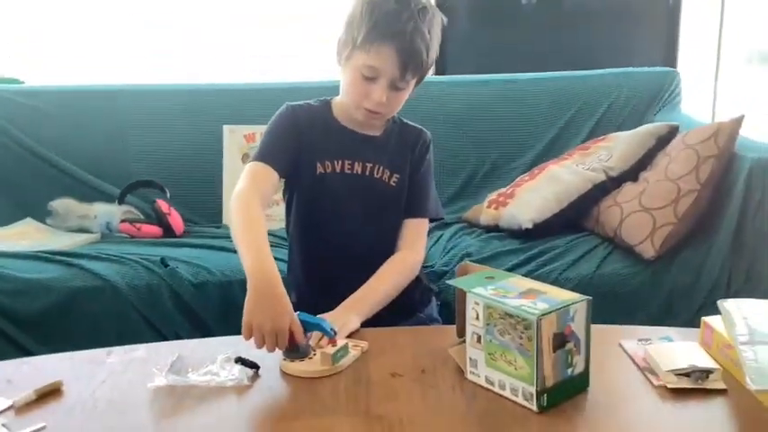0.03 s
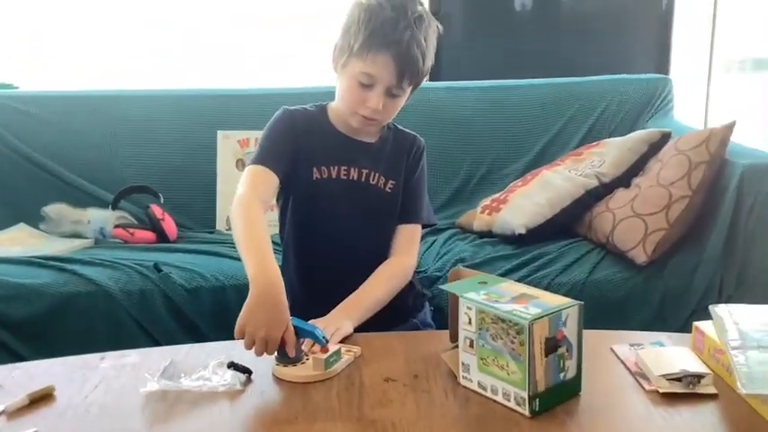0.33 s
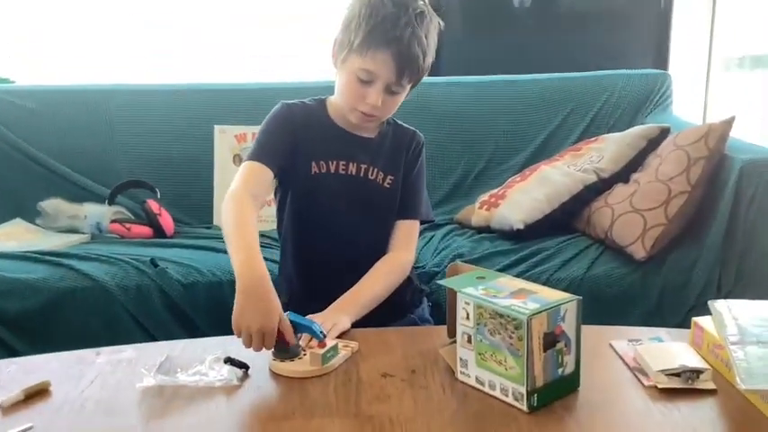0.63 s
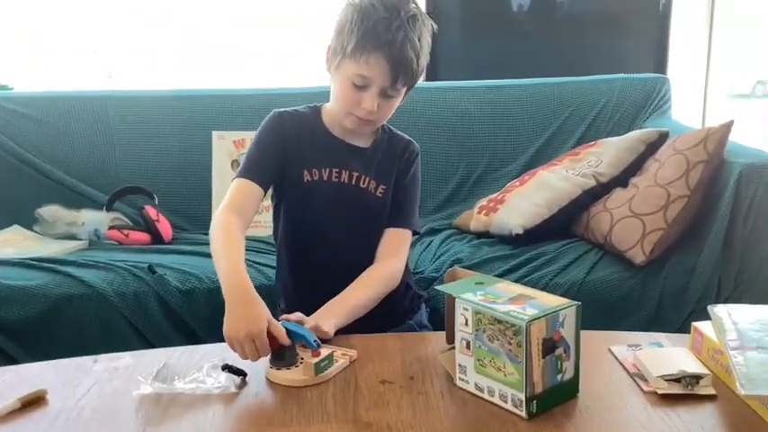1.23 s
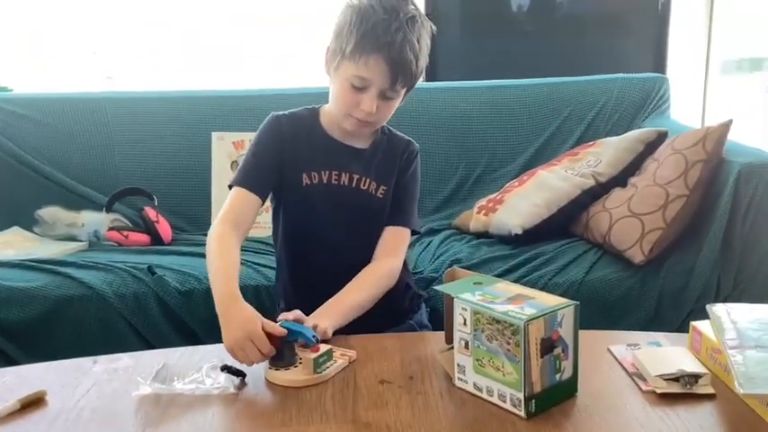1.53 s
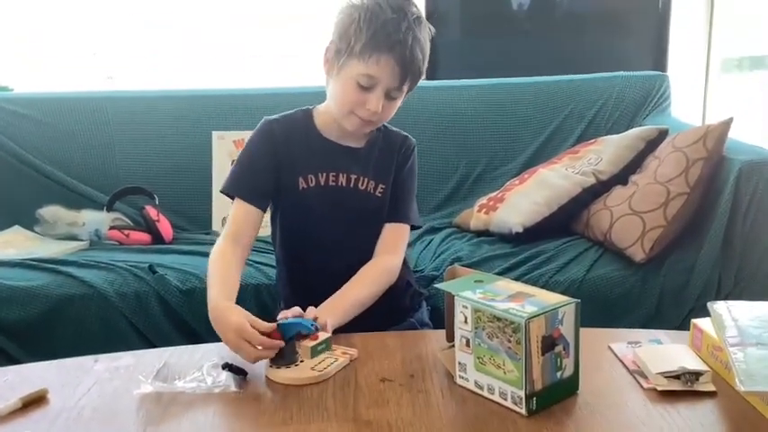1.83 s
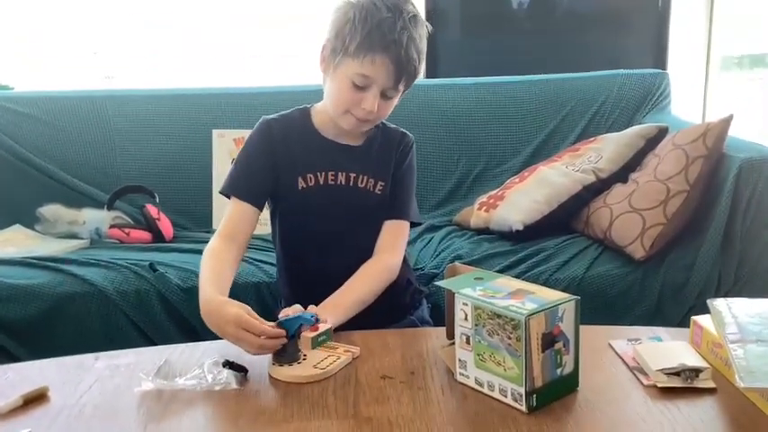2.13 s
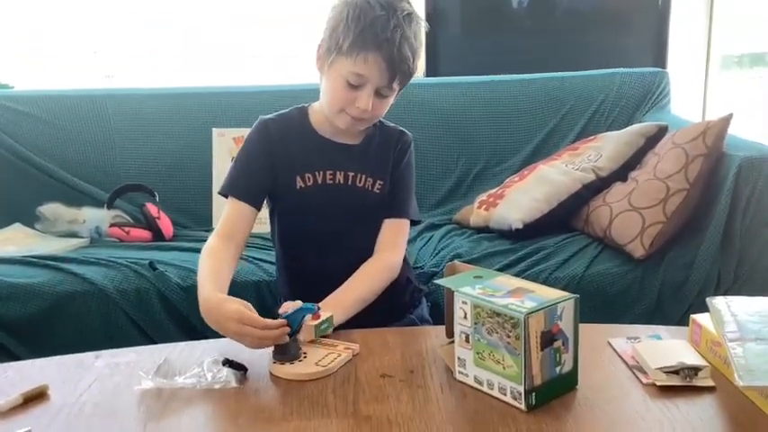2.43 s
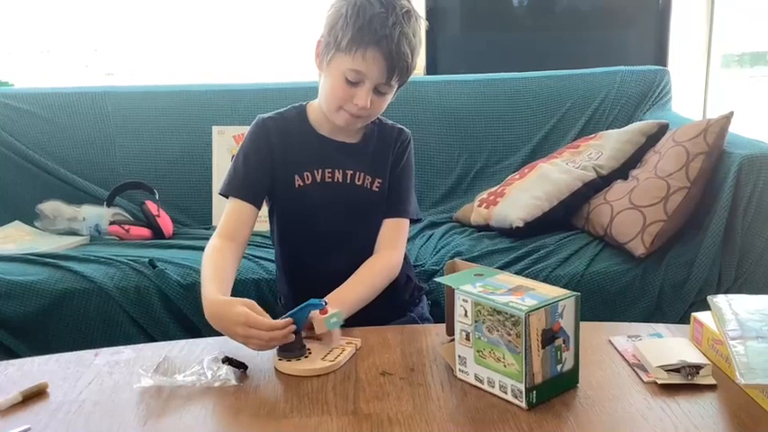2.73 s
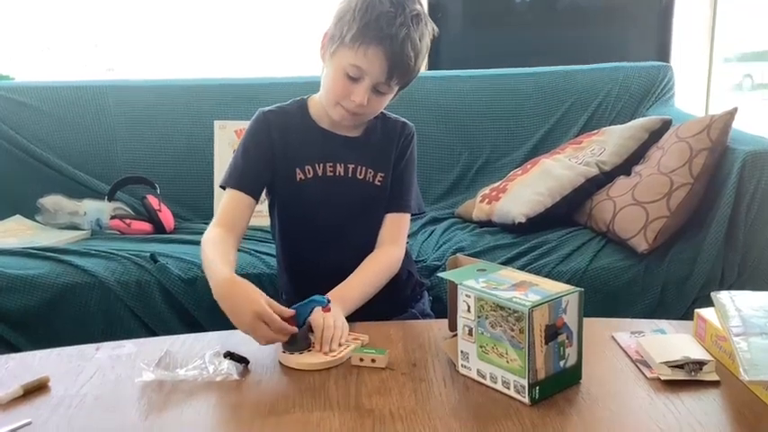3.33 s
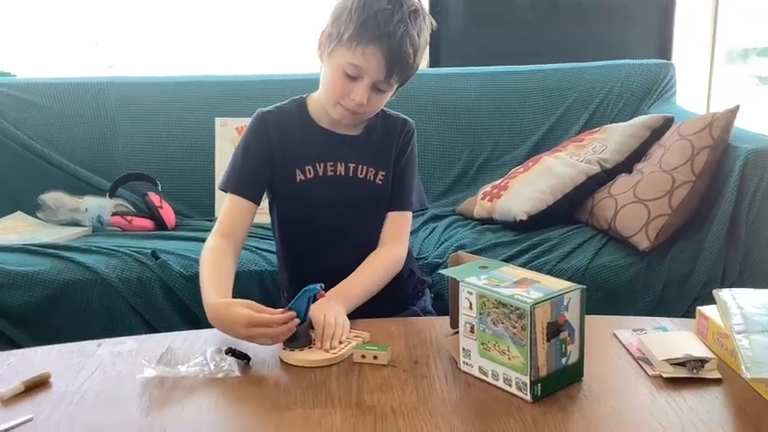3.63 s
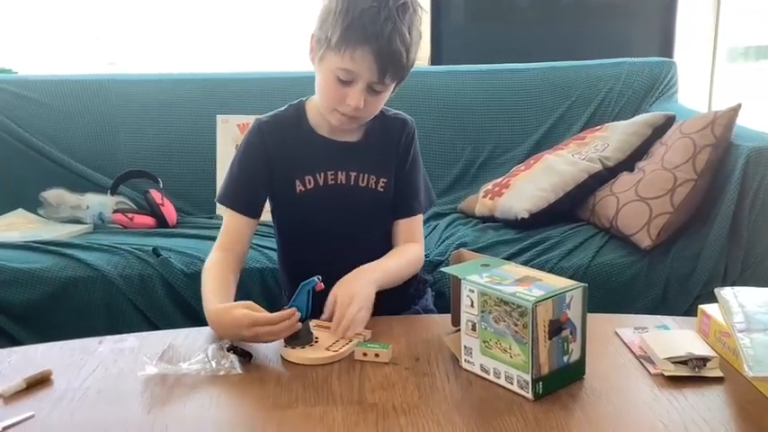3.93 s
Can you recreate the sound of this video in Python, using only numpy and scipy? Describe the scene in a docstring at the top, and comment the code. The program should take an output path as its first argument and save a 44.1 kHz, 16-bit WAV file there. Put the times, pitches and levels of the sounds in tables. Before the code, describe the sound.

A small toy crane clicks as it is turned, then knocks on a wooden table.

```python
"""Toy crane on a wooden table

A small toy crane is turned by hand: its plastic ratchet snaps tooth by tooth, its loose parts tap.
Its wooden base knocks on the table and a loose wooden piece topples with a short clatter.
Fingers rub on the toy; a living room answers with a few echoes, a short tail and a low rumble."""
import sys
import numpy as np
from scipy import signal
from scipy.fft import rfft, irfft, next_fast_len
from scipy.io import wavfile
from scipy.ndimage import uniform_filter1d, minimum_filter1d, map_coordinates

SR = 44100
rng = np.random.default_rng(int(sys.argv[2]) if len(sys.argv) > 2 else 0)


def unload_audio(sound):
    """Save the sound as a 16-bit wav file, at the path given as the first command line argument."""
    columns = np.transpose(np.atleast_2d(sound))
    # keep every value between -1 and 1, then stretch to whole-number steps
    steps = np.round(np.clip(columns, -1, 1) * 32767)
    wavfile.write(sys.argv[1], SR, steps.astype(np.int16))


N = 176400
T = np.arange(SR // 8) / SR  # time within one hit [s]


def amp(db):
    """Decibels to gain."""
    return 10 ** (np.asarray(db) / 20)


def unit(x):
    """Scale to rms 1."""
    return x / np.sqrt(np.mean(x ** 2) + 1e-20)


def along(points, hz):
    """Read a curve of (frequency [Hz], value) points on a log frequency axis."""
    freqs, values = np.transpose(points)
    return np.interp(np.log(hz + 1), np.log(freqs), values)


def filtered(x, response):
    """Zero-phase EQ: response gives the gain at each frequency."""
    size = next_fast_len(len(x) + 4096)
    return irfft(rfft(x, size) * response(np.fft.rfftfreq(size, 1 / SR)), size)[:len(x)]


def cut(x, hz, kind, order):
    """A causal high-pass or low-pass."""
    return signal.sosfilt(signal.butter(order, min(hz, SR / 3), kind, fs=SR, output="sos"), x)


def noise(colour, size):
    """Coloured noise of rms 1."""
    return unit(filtered(rng.standard_normal(size), lambda hz: amp(along(colour, hz))))


def pulse(colour):
    """A single pulse with a smooth spectrum, rms 1."""
    return unit(filtered(signal.unit_impulse(len(T), "mid"), lambda hz: amp(along(colour, hz))))


def burst(colour, hold, t60):
    """The noise of one contact: fast attack, hold [s], decay."""
    attack = 1 - np.exp(-T / .0005)
    decay = amp(-60 * np.maximum(T - hold, 0) / t60)
    return unit(noise(colour, len(T)) * attack * decay)


def ring(modes, rise_s, scatter_db, detune):
    """Damped modes, struck a little differently each time."""
    hz, db, t60 = np.transpose(modes)[:, :, None]
    strength, shift, phase = rng.standard_normal((3, len(modes), 1))
    decays = amp(db + scatter_db * strength - 60 * T / t60)
    partials = np.sin(2 * np.pi * (hz * (1 + detune * shift) * T + phase))
    attack = 1 - np.exp(-(T / rise_s) ** 2)
    return unit((decays * partials).sum(0) * attack)


def at_level(x, db):
    """Give a hit the energy of 4 ms at this level."""
    return x * amp(db) * np.sqrt(.004 * SR / np.sum(x ** 2))


def add(out, start_s, x):
    """Mix x into out from start_s."""
    part = out[max(0, round(start_s * SR)):][:len(x)]
    part += x[:len(part)]


# early reflections off near surfaces (delay [s], relative level [dB])
ECHOES = [(.0087, -48), (0.0116, -26), (0.0214, -22), (0.025, -20.5), (.0302, -18)]
# decay of the room's tail (frequency [Hz], t60 [s])
ROOM_DECAY = [(150, 0.99), (600, 0.48), (2000, 0.29), (7000, .33), (10000, 0.31), (15000, 0.26)]


def in_room(hit, send, echo_db, tail_db):
    """A hit, its echoes and a tail coloured by send, the sound it spreads in all directions."""
    hz, t, bands = signal.stft(rng.standard_normal(SR // 2), SR, nperseg=256)
    decay = amp(-60 * t / along(ROOM_DECAY, hz)[:, None])
    tail = signal.istft(bands * decay, SR, nperseg=256)[1]
    tail *= 1 - np.exp(-(np.arange(len(tail)) / SR / .0059) ** 2)  # blooms in about 6 ms
    send_power = uniform_filter1d(np.abs(rfft(send)) ** 2, size=25)
    send_hz = np.fft.rfftfreq(len(send), 1 / SR)
    wet = filtered(tail, lambda f: np.sqrt(np.abs(np.interp(f, send_hz, send_power))))
    out = wet * amp(tail_db) * np.linalg.norm(hit) / np.linalg.norm(wet)
    add(out, 0, hit)
    for delay, db in ECHOES:
        add(out, delay, amp(db + echo_db) * hit)
    ceiling_slap = amp(echo_db - 8) * cut(hit, 6800, "highpass", order=4)
    add(out, .0147, ceiling_slap)
    return out


# room tone spectrum (frequency [Hz], relative level [dB])
RUMBLE_COLOUR = [(25, -21), (45, -24), (68, 0.5), (110, 1.5), (160, -4.5), (230, 3), (380, -10), (700, -11),
                 (1100, -5), (2000, -14), (4000, -19.5), (8000, -24), (15000, -55)]


def room_rumble():
    """The living room's steady, low bed of noise."""
    return amp(-55) * noise(RUMBLE_COLOUR, N)


# envelope of the finger rub (time [s], level [dB])
RUB_LEVEL = [(0, -53), (.3, -56.5), (.7, -63), (.8, -61), (1.05, -64.5), (1.2, -60), (1.5, -63.5),
             (2.2, -59.5), (2.65, -63), (2.78, -60.5), (3.1, -65), (4, -67)]
# friction spectrum (frequency [Hz], relative level [dB])
RUB_COLOUR = [(500, -63), (2000, -12), (4500, -1), (7500, 6), (11000, -0.5), (15000, -8.5), (16500, -36)]


def finger_rub():
    """A faint, slightly uneven hiss of fingers sliding on the toy."""
    t = np.arange(N) / SR
    knots_per_s, uneven_db = 25, .6
    knots = rng.standard_normal(int(t[-1] * knots_per_s) + 4)
    wobble_db = uneven_db * map_coordinates(knots, [t * knots_per_s])
    return noise(RUB_COLOUR, N) * amp(np.interp(t, *np.transpose(RUB_LEVEL)) + wobble_db)


# one click per tooth (time [s], level [dB], pawl pitch [Hz], pawl ring [dB], body EQ [dB], edge EQ [dB])
TEETH = [(0.0803, -20, 5850, -8, 10.5, -3), (0.4876, -19.5, 7800, -2, 11.5, -1),
         (1.6008, -13, 7080, 2.5, 3.5, 1), (1.686, -12, 6250, 1.5, 3.5, -4),
         (1.7479, -15, 6910, -7, 3, -0.5), (1.9161, -12.5, 7130, 7.5, 3, 3), (2.0752, -15, 7300, -10, 0, 5),
         (2.2839, -16.5, 9640, 4.5, 5.5, 4), (2.4203, -17.5, 7130, -1, 1, 3),
         (3.4436, -15.5, 6820, 0.5, 5, -0.5), (3.5585, -14.5, 6510, -10.5, -1.5, -8.5),
         (3.6204, -16.5, 6770, 4, 5.5, 2.5), (3.7056, -19, 6690, -2.5, 5, 2),
         (3.7643, -17, 6600, 1, 2.5, 1)]
# modes of the plastic housing (frequency [Hz], relative level [dB], t60 [s])
HOUSING_MODES = [(1707, -20.5, 0.022), (2694, -19.5, 0.015), (3630, -16, 0.018), (5450, -0.5, 0.013),
                 (6530, -18, 0.021), (7060, 6, 0.014), (9290, -9, 0.0066), (9436, 5.5, 0.0068),
                 (10750, -4.5, 0.0093), (13000, -44.5, .007), (15100, 1, 0.0027)]
# the pawl's bright transient (frequency [Hz], relative level [dB])
SNAP_COLOUR = [(300, -39.5), (1200, -26), (2600, -13.5), (4400, -13.5), (5500, 1), (8000, 6), (10500, -2.5),
               (12500, -6.5), (15000, -6.5), (16500, -11)]


def ratchet():
    """The pawl snaps off each tooth, rings briefly and shakes the housing."""
    body_hz, edge_hz = 4970, 11000
    snap_t60, pawl_t60, lead_in_s = .009, .0065, .0014
    out = np.zeros(N)
    for start, db, pawl_hz, pawl_db, body_db, edge_db in TEETH:
        # body is a low shelf; edge applies once across the band and twice above edge_hz
        below = lambda f, corner_hz: 1 / (1 + (f / corner_hz) ** 8)
        eq = lambda f: amp(body_db * below(f, body_hz) + edge_db * (2 - below(f, edge_hz)))
        housing = ring(HOUSING_MODES, rise_s=.00066, scatter_db=3, detune=.015)
        pawl = amp(pawl_db) * ring([(pawl_hz, 0, pawl_t60)], rise_s=.0009, scatter_db=0, detune=0)
        snap = amp(4.5) * burst(SNAP_COLOUR, hold=.00091, t60=snap_t60)
        direct = filtered(unit(housing + snap), eq) + pawl
        send = filtered(unit(amp(-4) * housing + pulse(SNAP_COLOUR)), eq) + amp(-5.5) * pawl
        add(out, start, in_room(at_level(direct, db), send, echo_db=0, tail_db=-9))
        # each click opens with a faint noise lead-in that softens its attack
        lead_in = burst(SNAP_COLOUR, hold=lead_in_s, t60=snap_t60)
        add(out, start - lead_in_s, at_level(lead_in, db - 12.5))
    return out


# taps of loose plastic parts (time [s], level [dB])
TAPS = [(0.2069, -35), (2.428, -32.5), (2.709, -38), (2.789, -42), (2.8407, -30.5), (2.8553, -28),
        (2.878, -42), (2.954, -38.5), (3.3074, -21), (3.321, -33), (3.331, -35)]
# spectrum of one tap (frequency [Hz], relative level [dB])
TAP_COLOUR = [(500, -33), (1600, 9.5), (3500, -3), (6300, 7.5), (8500, -4), (12000, -21.5), (16000, -23)]


def loose_parts():
    """The jib and hook tap in their joints when the toy is jolted."""
    out = np.zeros(N)
    for start, db in TAPS:
        tap = at_level(burst(TAP_COLOUR, hold=.00021, t60=.014), db)
        add(out, start, in_room(tap, pulse(TAP_COLOUR), echo_db=1, tail_db=-6))
    return out


# wood hitting the table (time [s], level [dB], low-pass corner [Hz], table-top share [dB])
KNOCKS = [(.222, -40.5, 1630, 12), (.244, -45.5, 1530, -2), (.936, -53.5, 3000, -11), (1.003, -49, 2560, 1),
          (1.1398, -25.5, 2700, -4), (1.208, -42, 2380, 9), (2.581, -45, 2000, 6), (2.712, -40.5, 2480, -1),
          (2.8408, -15, 2700, 1.5), (2.8555, -19, 1720, 6), (2.987, -39.5, 2440, 4),
          (3.030, -30.5, 1030, -1.5), (3.065, -24, 1300, 10), (3.087, -33, 1190, -1),
          (3.17, -18.5, 2400, 2.5), (3.2355, -8.5, 4360, -12), (3.259, -15.5, 5100, -12),
          (3.266, -21.5, 3000, 9), (3.2835, -11, 3260, -18), (3.3075, -11, 5000, -11.5),
          (3.321, -24, 3960, 1.5), (3.336, -20, 2820, -12), (3.347, -18.5, 2880, -1),
          (3.355, -29.5, 2810, -16), (3.364, -27, 2620, -20)]
# modes of the toy's wood on the table (frequency [Hz], relative level [dB], t60 [s])
WOOD_MODES = [(467, -19.5, 0.044), (628.3, -15, 0.16), (886, -8, 0.059), (1182, -4.5, 0.065),
              (1380, 0, 0.011), (1740, 0.5, 0.022), (2150, 4.5, 0.028), (2558, -0.5, 0.025),
              (3030, -1.5, 0.016), (3270, -29, 0.021), (4130, -10, 0.011), (5070, -1.5, 0.014),
              (6400, -5, 0.006)]
# a knock's transient (frequency [Hz], relative level [dB])
CRACK_COLOUR = [(150, -29), (450, -16), (1000, 2), (2200, 3), (4000, 0), (7000, -3.5), (10000, -16),
                (16000, -23)]


def wood_knocks():
    """Wood meets the table; softer contacts lose their treble, flatter ones drive the table top."""
    table_hz, table_octaves, crack_db = 1036, .7, -2.5

    def contact(x, corner_hz, table_db):
        """A bell EQ for the table top, then a high cut and a low cut."""
        bell = lambda f: amp(table_db * np.exp(-(np.log2((f + 1) / table_hz) / table_octaves) ** 2))
        softened = cut(filtered(x, bell), corner_hz, "lowpass", order=2)
        return cut(softened, 520, "highpass", order=2)

    out = np.zeros(N)
    for start, db, corner_hz, table_db in KNOCKS:
        body = ring(WOOD_MODES, rise_s=.0009, scatter_db=1.2, detune=.005)
        crack = amp(crack_db) * burst(CRACK_COLOUR, hold=.0017, t60=.019)
        direct = contact(body + crack, corner_hz, table_db)
        send = contact(amp(-.5) * body + amp(crack_db) * pulse(CRACK_COLOUR), corner_hz, table_db)
        add(out, start, in_room(at_level(direct, db), send, echo_db=-5, tail_db=-7))
    return out


# the table top's low boom (frequency [Hz], relative level [dB])
THUD_COLOUR = [(70, -23), (130, -18), (205, -1), (300, -12), (460, -3.5), (650, -12), (1200, -51)]


def table_thud():
    """The table top booms softly under each knock, more so when the contact is flat."""
    out = np.zeros(N)
    for start, db, _, table_db in KNOCKS:
        boom = burst(THUD_COLOUR, hold=.005, t60=.45)
        add(out, start, at_level(boom, db + table_db - 23.5))
    return out


def scene():
    """The toy over the room's steady rumble, in mono."""
    return (ratchet() + wood_knocks() + table_thud() + loose_parts() + finger_rub() + room_rumble())[None]


def record(dry):
    """A fast limiter catches the highest peaks; a steep low-pass trims the very top."""
    limit, span, top_hz = .88, round(.003 * SR), 15950
    mix = dry[0]
    needed_gain = limit / np.maximum(np.abs(mix), limit)
    smooth_gain = uniform_filter1d(minimum_filter1d(needed_gain, 2 * span), span)
    return filtered(mix * smooth_gain, lambda hz: 1 / np.sqrt(1 + (hz / top_hz) ** 160))[None]


dry = scene()
out = record(dry)
unload_audio(out)
```